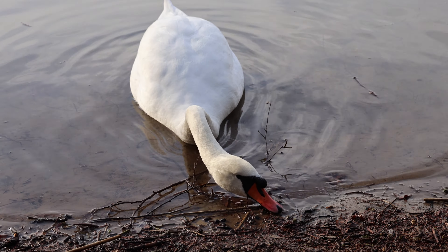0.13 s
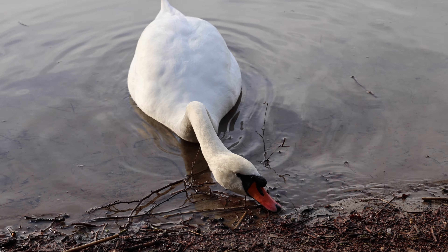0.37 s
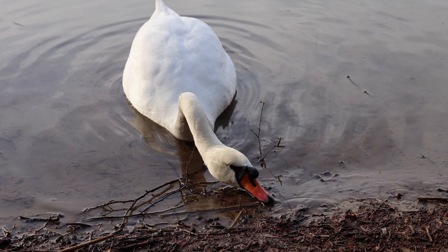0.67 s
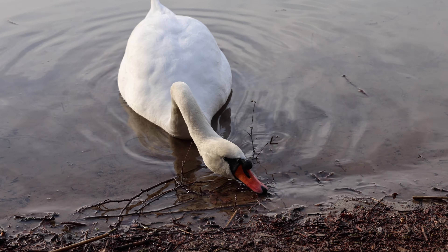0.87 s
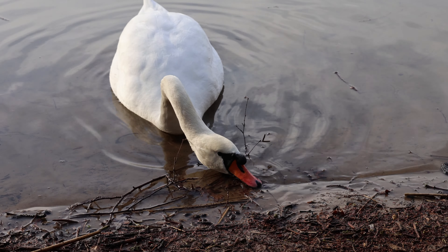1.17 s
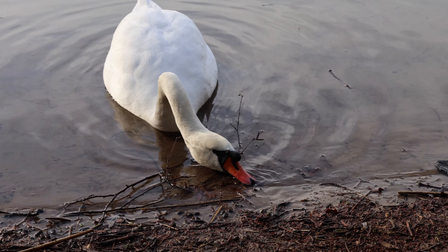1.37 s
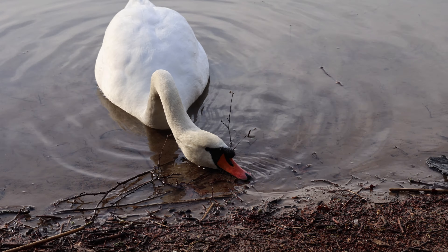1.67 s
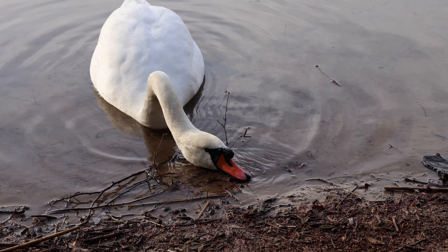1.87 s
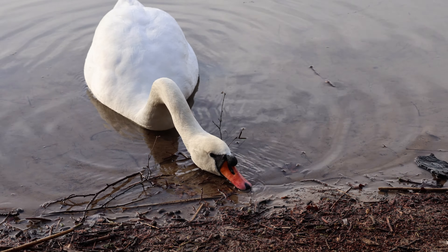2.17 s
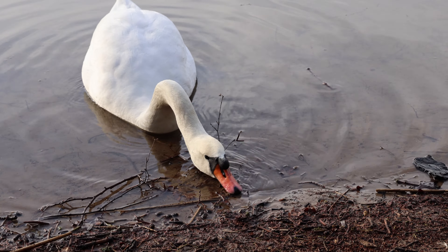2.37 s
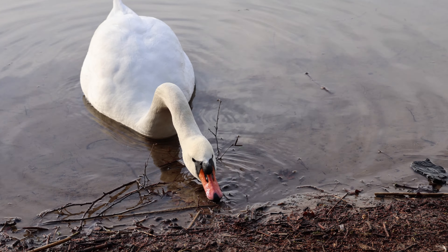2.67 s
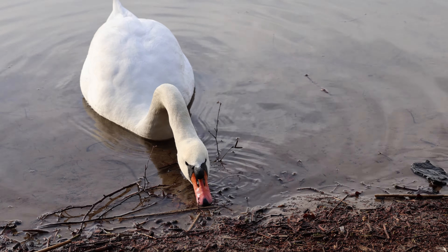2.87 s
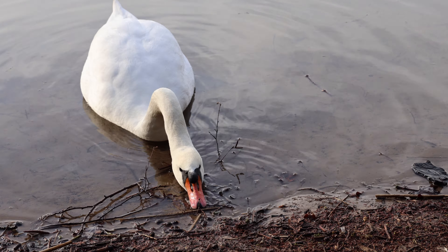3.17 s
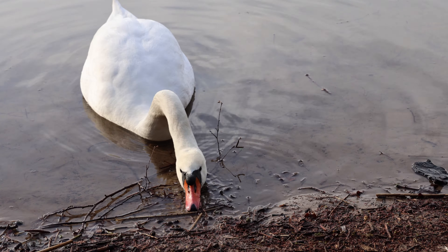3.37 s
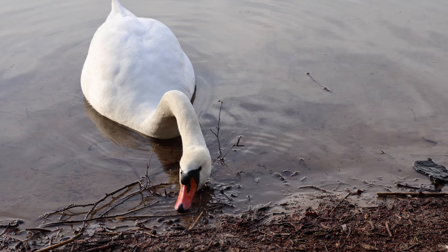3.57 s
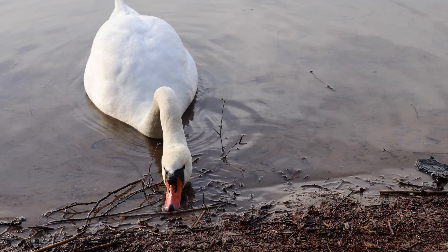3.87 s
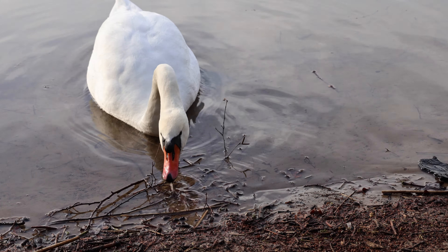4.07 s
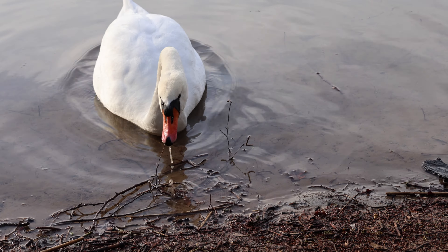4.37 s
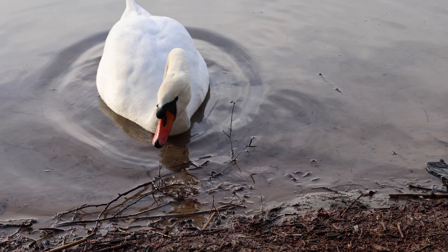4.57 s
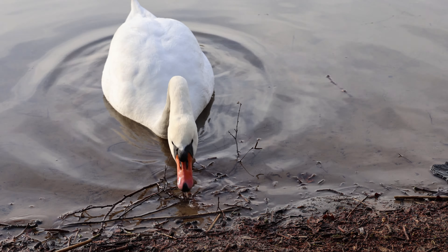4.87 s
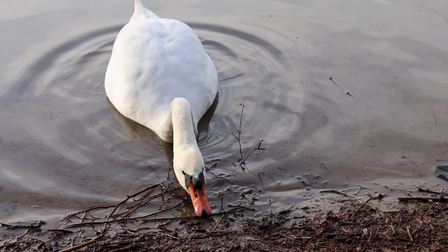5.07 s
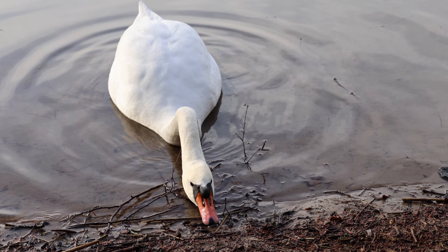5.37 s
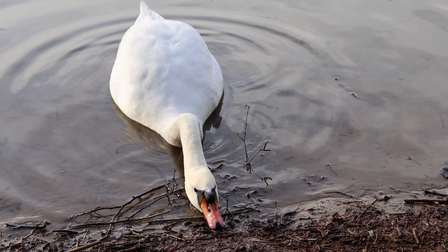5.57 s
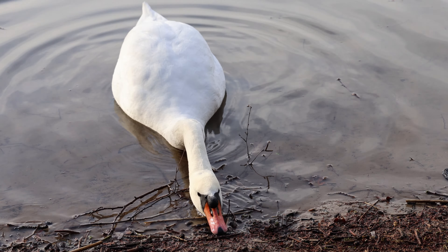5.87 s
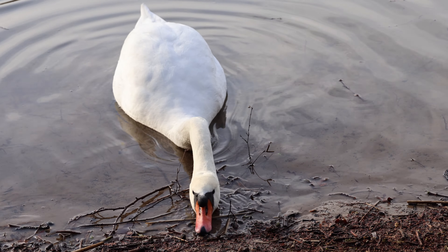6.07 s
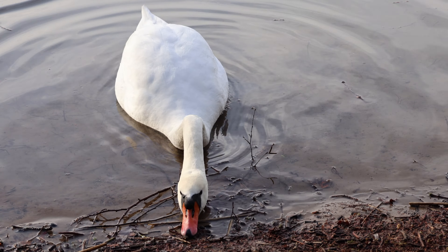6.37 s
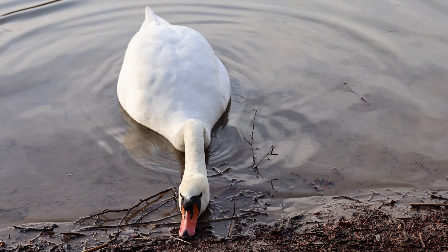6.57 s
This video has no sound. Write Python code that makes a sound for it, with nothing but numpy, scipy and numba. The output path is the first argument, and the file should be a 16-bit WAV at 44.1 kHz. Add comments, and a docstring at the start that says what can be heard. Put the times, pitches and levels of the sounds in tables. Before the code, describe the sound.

A swan dabbles in wet mud with tiny pops and squelches, then water trickles and plops off its lifted bill.

```python
"""Wet squelches and tiny pops, close by: a swan dabbles in the mud at the edge of a lake.
Its bill squeezes the mud, rings hollow and bursts bubbles; it lifts its head, water streams off and
plops back as trapped air rings, then it feeds on. A distant rumble and soft finger bumps on a
hand-held camera lie underneath; the camera's hum comb adds a faint flutter."""
import sys
import numpy as np
from scipy import signal
from scipy.fft import rfft, irfft, next_fast_len
from scipy.io import wavfile
from scipy.ndimage import uniform_filter1d
from numba import njit

SR = 44100
rng = np.random.default_rng(int(sys.argv[2]) if len(sys.argv) > 2 else 0)


def pcm_store(signal):
    """Save signal as 16-bit PCM."""
    levels = np.round(np.clip(np.atleast_2d(signal), -1, 1) * 32767)
    wavfile.write(sys.argv[1], SR, levels.astype(np.int16).T)


N = 296219
TIME = np.arange(N) / SR

# bill smacks, a bubble burst each: (time [s], level [dB], pitch [Hz], length [cycles], L-R [dB])
SMACKS = [(0.3126, -52.5, 4240, 6.4, -9), (0.4542, -40, 2630, 5.4, -6), (0.485, -46.5, 4500, 4.0, -9),
          (0.5017, -43, 4460, 1.1, -17), (0.5219, -33, 3570, 2.5, -6), (0.665, -47.5, 6300, 4.1, -15),
          (0.8242, -46.5, 4030, 5.4, -12), (0.949, -56.5, 6030, 5.1, -6), (1.1664, -38, 3710, 6.6, -10),
          (1.191, -41, 4360, 1.8, -14), (1.1978, -29, 5200, 1.75, -1), (1.3153, -34, 4100, 1, 4),
          (1.318, -33.5, 6200, 1.35, -4), (1.3597, -34, 3270, 1.7, 5), (1.437, -41.5, 6090, 2.8, -3),
          (1.4404, -30.5, 5700, 1.3, -1), (1.4433, -33, 7110, 0.72, -7), (1.446, -35, 10700, 3.6, 0),
          (1.5238, -32.5, 3180, 0.45, 1), (1.5303, -26.5, 3400, 1.7, 1), (1.581, -44, 8300, 2.4, -8),
          (1.6097, -40.5, 6700, 4.5, -3), (1.6308, -38.5, 5360, 2.4, 1), (1.6473, -38, 5340, 2.5, -2),
          (1.68, -51, 5100, 2.1, -6), (1.7034, -29, 4960, 0.93, -2), (1.706, -28, 3870, 2.4, 1),
          (1.751, -32.5, 4440, 0.85, 4), (1.766, -43, 4630, 2.1, 0), (1.7974, -42.5, 14000, 7.0, -5),
          (1.8857, -31.5, 3700, 2.7, 4), (1.8957, -33, 3940, 2.1, 1), (1.899, -26, 4800, 1.9, -2),
          (1.9013, -23, 4960, 0.83, -1), (1.912, -30.0, 4230, 1.5, 0), (1.93, -27, 3640, 4.1, 1),
          (1.9735, -41, 4900, 2.3, 1), (1.9782, -23.5, 5770, 1.4, -1), (1.9837, -23.5, 4400, 1.7, 3),
          (1.9848, -24.5, 4200, 1.6, 0), (2.0624, -32, 4280, 1, 3), (2.067, -35, 3250, 2.3, 2),
          (2.069, -32.5, 5330, 0.63, 1), (2.1484, -40.5, 5450, 1.1, 6), (2.1498, -31.5, 6490, 1.3, 0),
          (2.1561, -33.0, 3380, 2, 6), (2.1606, -31.5, 5530, 1.15, -2), (2.1936, -40.5, 5550, 1.1, -1),
          (2.2517, -39, 9960, 0.76, -5), (2.3324, -38.5, 5400, 1.9, 1), (2.3353, -34, 5700, 1.2, -2),
          (2.353, -38.0, 5840, 1.2, -2), (2.366, -37, 4060, 0.45, 5), (2.369, -43, 5930, 1.2, -8),
          (2.4282, -31, 6260, 2.1, -1), (2.5035, -42, 4850, 1.6, 6), (2.9285, -42.5, 4810, 7, 2),
          (3.0092, -40, 4030, 4.4, -19), (3.028, -37, 3750, 1.4, 9), (3.0428, -39, 3830, 0.97, 3),
          (3.0906, -40, 2600, 3.6, -12), (3.0967, -34.5, 5170, 0.98, -4), (3.1693, -40, 4870, 2.3, 1),
          (3.1703, -31, 5100, 0.65, 2), (3.2044, -38, 6010, 3.1, -1), (3.2498, -34.5, 5630, 4.3, -1),
          (3.255, -33, 6700, 2.2, -2), (3.3396, -33, 6040, 3.6, 0), (3.342, -39, 3220, 6.3, 2),
          (3.597, -35.5, 3430, 2.7, 9), (3.6768, -38.5, 4500, 1.2, 8), (3.7855, -26, 7180, 1.5, -3),
          (3.7961, -46, 11230, 2.3, 4), (3.8441, -28, 5800, 3.3, 1), (3.917, -28.5, 3040, 4.9, 9),
          (3.9754, -30.5, 6490, 0.54, 3), (3.9771, -43, 5000, 3.3, 11), (3.9789, -36, 6170, 4.9, 9),
          (4.0753, -28.5, 4170, 1.0, 4), (4.093, -26, 3470, 1.5, 6), (4.1077, -29, 3230, 2.6, -2),
          (4.1248, -36, 3400, 0.9, 6), (4.143, -45, 3710, 1.1, 25), (4.2703, -29.5, 5000, 2.1, 8),
          (4.3212, -33, 3750, 2.7, 13), (4.3975, -29, 5720, 0.76, -1), (4.4494, -36, 5000, 1.2, 5),
          (4.5632, -29.5, 6060, 0.84, 6), (4.6116, -39, 3860, 8.3, 12), (4.646, -29, 2300, 1.1, -3),
          (4.6499, -25.5, 3640, 1.3, 8), (4.6514, -33, 2950, 1.9, 2), (4.713, -42.5, 8400, 3.7, 7),
          (4.7444, -34, 4000, 7.9, -7), (4.783, -39.5, 6270, 7.0, 7), (4.8807, -38, 6290, 6.2, -1),
          (4.929, -48, 7670, 5, 12), (5.0758, -50.5, 5280, 7.3, 11), (5.0936, -47, 4470, 4.8, 18),
          (5.117, -55, 7240, 1.8, 10), (5.2869, -48.5, 3430, 3.6, 2), (5.3834, -49.5, 4440, 0.81, 6),
          (5.435, -45.5, 3600, 3.9, -2), (5.4524, -41.5, 3760, 3.6, -2), (5.4755, -43.5, 7100, 2.1, -5),
          (5.5356, -53, 9260, 8, -18), (5.611, -47.5, 4910, 3.6, -1), (5.649, -38.5, 5900, 1.3, -1),
          (5.7072, -38.5, 3010, 1.16, -1), (5.7649, -50, 8100, 3.7, -4), (5.783, -41.5, 3820, 6.8, -1),
          (5.787, -33.5, 3480, 1.2, -4), (5.7936, -51, 8800, 6.2, -14), (5.8006, -39.5, 7470, 3.9, 3),
          (5.8361, -41, 5180, 1.4, -2), (5.907, -49.5, 8990, 5.1, -16), (5.9263, -41.5, 8700, 3.4, -14),
          (5.9455, -38.0, 3040, 1.9, -4), (5.994, -52, 2640, 3.0, -4), (6.079, -35, 2800, 2.04, -9),
          (6.2432, -50, 7760, 3.2, -3), (6.4307, -42, 2930, 1.8, -4), (6.469, -41.5, 5240, 0.78, 0),
          (6.4806, -45, 8650, 3.2, -1), (6.5007, -38, 9400, 1.3, -1), (6.549, -45.5, 2900, 6.0, -4),
          (6.563, -39, 8850, 1.4, -6), (6.584, -34, 2680, 2.2, 2), (6.5857, -24, 2580, 1.7, -2),
          (6.6451, -52, 8040, 5.9, -3), (6.6804, -36.5, 3590, 2.2, 1)]
# bill direction: (time [s], L-R [dB], left phase lead [rad])
BILL_DIRECTION = [(1.1, -6, -1.4), (1.4, -0.5, -0.032), (2.4, 3, -0.36), (3.2, -1.5, 0.22),
                  (3.6, 1.5, 1.35), (4.8, 9.5, 2.2), (5.5, -1.5, -0.073), (6.7, -1.5, 0.84)]
# bill stirring, leaving and re-entering the water:
# (time [s], length [s], level [dB], first pitch [Hz], last pitch [Hz])
BILL_SLOSHES = [(3.586, 0.037, -56.5, 4230, 2910), (3.767, 0.076, -57.5, 3400, 3080),
                (3.892, 0.068, -56, 2880, 3530), (4.081, 0.048, -51.5, 3130, 3020),
                (4.159, 0.042, -58.5, 2700, 2600), (4.267, 0.062, -56, 5750, 3570),
                (4.328, 0.016, -67, 4370, 3800), (4.402, .045, -51.5, 2970, 3330),
                (4.459, 0.016, -61.5, 4600, 3620), (4.53, 0.021, -63, 3400, 3800),
                (4.575, .055, -60, 2800, 3950), (4.631, 0.035, -62, 2530, 2500),
                (4.683, 0.11, -72, 4000, 4700)]


def undb(db):
    """Decibels to gain."""
    return 10 ** (np.asarray(db) / 20)


def curves(table):
    """Columns after the time column, interpolated per sample."""
    times_s, *columns = np.transpose(table)
    return [np.interp(TIME, times_s, column) for column in columns]


def swell(start_s, end_s, attack_s, release_s):
    """Linear rise, hold, exponential decay after end_s."""
    attack = np.clip((TIME - start_s) / attack_s, 0, 1)
    return attack * np.exp(-np.clip((TIME - end_s) / release_s, 0, 30))


def unit(x):
    """Scale to rms 1."""
    return x / np.sqrt(np.mean(x ** 2) + 1e-20)


def band(x, lo_hz, hi_hz, order=2):
    """Causal band-pass."""
    sos = signal.butter(order, [lo_hz, min(hi_hz, .48 * SR)], "band", fs=SR, output="sos")
    return signal.sosfilt(sos, x)


def colour(x, points):
    """Shape a spectrum by (frequency [Hz], gain [dB]) points."""
    hz, db = np.transpose(points)
    gain_db = np.interp(np.log(np.fft.rfftfreq(N, 1 / SR) + 1), np.log(hz), db)
    return irfft(rfft(x) * undb(gain_db), N)


def sides(pan_db):
    """Left and right gains, mean 1; positive is left."""
    gains = undb(np.array([[.5], [-.5]]) * pan_db)
    return gains / gains.mean(axis=0)


def add(out, time_s, sound):
    """Mix in a stereo sound."""
    i = max(int(time_s * SR), 0)
    out[:, i:i + sound.shape[-1]] += sound[..., :N - i]


def bubble(hz, rise_oct_per_s, swell_s, t60_s, glide_s=0.026):
    """Damped resonance whose pitch glides, then levels off; a bubble nearing the surface climbs."""
    t = np.arange(int((t60_s + 2 * swell_s) * SR) + 8) / SR
    envelope = (1 - np.exp(-(t / swell_s) ** 2)) * np.exp(-np.log(1000) * t / t60_s)
    octaves = rise_oct_per_s * glide_s * (1 - np.exp(-t / glide_s))
    return envelope / envelope.max() * np.sin(2 * np.pi * np.cumsum(hz * 2 ** octaves) / SR)


@njit
def ring_grains(start, hz, cycles, size):
    """Sum of tone pips, each peaking after half its cycles, then fading; start in samples."""
    out = np.zeros(N)
    for k in range(len(start)):
        fade = 2 * hz[k] / (cycles[k] * SR)
        phasor, step = size[k] + 0j, np.exp(2j * np.pi * hz[k] / SR - fade)
        for i in range(min(N - start[k], int(9 / fade))):
            out[start[k] + i] += phasor.imag * i * fade
            phasor *= step
    return out


def fizz(rate_per_s, lo_hz, hi_hz, cycles, spread_db, scatter_db, count):
    """Stream of tiny bubbles, many weak and a few strong, held near rms 1."""
    when, pitch, strength, chance, side, shape = rng.random((count, 6)).T
    start = (when * N).astype(np.int64)
    hz = np.minimum(lo_hz * (hi_hz / lo_hz) ** pitch, .45 * SR)
    sounding = chance < rate_per_s * N / SR / count
    size = undb(-spread_db * np.log(strength + 0.0067)) * sounding
    pan = undb(scatter_db * (side - .5))
    right_lag = (3 * shape).astype(np.int64)
    pips = np.array([ring_grains(start + lag, hz, cycles * (.5 + shape), size * gain)
                     for lag, gain in ((1, pan), (right_lag, 1 / pan))])
    power = uniform_filter1d(uniform_filter1d(np.mean(pips ** 2, axis=0), size=4000), size=4000)
    return pips / np.sqrt(np.abs(power) + 0.0048 * power.mean())


def distant_rumble(gain_db=1):
    """Slowly swelling noise from across the lake, nearly mono around 200 Hz."""
    spectrum = [(18, -78), (30, -47), (64, -22.5), (168, -16), (202, 2), (350, -17), (728, -6.5), (996, -8),
                (1510, -10.5), (3320, -26), (4660, -38.5), (6500, -46.5), (9680, -48.5), (11300, -55),
                (13600, -52), (15500, -59)]  # rumble: (frequency [Hz], relative density [dB])
    loudness = [(0.0, -63), (0.58, -60.5), (1.18, -63), (1.46, -57), (2.17, -55.5), (2.71, -59.5),
                (3.78, -55.5), (4.26, -54), (5.16, -57), (6.72, -59)]  # slow swell: (time [s], level [dB])
    width = [(60, 8.5), (200, -30), (700, -12.5), (1300, -7), (2400, -1.5), (8000, -0.5)]  # stereo width: (frequency [Hz], side minus mid [dB])
    mid, side = colour(rng.standard_normal((2, N)), spectrum)
    level_db, = curves(loudness)
    rumble = mid + colour(side, width) * np.array([[1], [-1]])
    return rumble / np.std(band(mid, 168, 3300, order=4)) * undb(level_db + gain_db) * sides(0.047)


def handling(t60_cycles=4.5, bump_pan_db=31, rustle_db=-1):
    """Fingers rustle on the camera body and bump it by the left microphone."""
    finger_bumps = [(2.175, -39.5, 171), (2.306, -40.5, 123), (2.41, -38, 203), (2.487, -34.5, 153),
                    (2.5244, -24, 282), (2.540, -25, 160), (2.551, -32, 330), (2.586, -30.5, 220),
                    (2.968, -28.5, 284), (3.223, -36, 260), (3.378, -40.5, 233), (3.552, -39.5, 250),
                    (4.367, -39.5, 211), (4.464, -32, 178), (4.718, -30, 167), (4.752, -27.5, 216),
                    (4.794, -30.5, 167), (4.818, -35.5, 190), (4.833, -41.5, 182)]  # soft knocks: (time [s], level [dB], pitch [Hz])
    grip = [(0.0, -64), (1.55, -58), (1.79, -59.5), (2.47, -51.5), (2.79, -62), (3.27, -54.5),
            (3.65, -63.5), (3.91, -53.5), (4.02, -55), (4.77, -49), (5.16, -61), (5.69, -57), (6.21, -62.5),
            (6.72, -56.5)]  # low grip rustle: (time [s], level [dB])
    bumps = np.zeros((2, N))
    for time_s, db, hz in finger_bumps:
        knock = bubble(hz, 0, swell_s=0.0016, t60_s=t60_cycles / hz)
        add(bumps, time_s, undb(db) * sides(bump_pan_db) * knock)
    grip_db, = curves(grip)
    rustle = unit(band(rng.standard_normal(N) + .5 * rng.standard_normal((2, N)), 123, 288))
    return band(bumps, 68, 1100, order=3) + rustle * undb(grip_db + rustle_db) * sides(0.9)


def dabbling(hollow_width_hz=600, smack_mud_db=-29, smack_spray_db=-38, stray_db=-2):
    """Each squeeze crackles in the mud, rings the bill's wet hollow and bursts stray bubbles."""
    # bill squeezes: (start [s], end [s], squelch [dB], spray [dB], hollow [dB], hollow pitch [Hz])
    squeezes = [(0.07, 0.137, -98, -84, -99, 3520), (.296, 0.316, -79, -78, -84, 4200),
                (0.495, 0.557, -65, -70.5, -63.5, 3370), (.615, 0.656, -84, -81.5, -90, 3500),
                (1.213, 1.286, -59.5, -76, -62.5, 3800), (1.308, 1.409, -62.5, -71, -67, 3460),
                (1.432, 1.495, -65, -69, -64.5, 3370), (1.524, 1.657, -62.5, -70, -92, 3630),
                (1.696, 1.802, -70, -69, -58.5, 3430), (1.883, 1.999, -51, -77, -52, 3500),
                (2.037, 2.099, -71, -76, -61, 3400), (2.132, 2.199, -68, -68.5, -64, 3330),
                (2.226, 2.398, -74, -92, -61.5, 3680), (2.992, 3.046, -83, -60.5, -60.5, 3650),
                (3.087, 3.195, -68, -85, -60.5, 3300), (3.204, 3.26, -59.5, -78, -73, 3300),
                (5.101, 5.13, -82, -71.5, -76, 4600), (5.591, 5.68, -68, -95, -66.5, 3370),
                (5.748, 5.856, -77, -74.5, -68.5, 3570), (5.904, 6.031, -90, -72, -69.5, 3500),
                (6.23, 6.264, -62.5, -70.5, -75, 3500), (6.315, 6.363, -71, -80.5, -74.5, 3950),
                (6.458, 6.58, -70, -65, -72.5, 2840), (6.625, 6.683, -69, -67.5, -79, 3300)]
    sparkle = [(1.2, -4), (1.8, -5), (2.3, 7.5), (3.1, -16), (5.1, 2), (5.6, -8.5), (6.7, -12)]  # top treble of the spray: (time [s], relative level [dB])
    ticks = fizz(380, 4200, 14000, cycles=1.7, spread_db=6, scatter_db=8, count=6000)
    seep = fizz(1500, 2800, 5000, cycles=1.2, spread_db=4, scatter_db=8, count=12000)
    strays = fizz(35, 8000, 10500, cycles=9, spread_db=4, scatter_db=8, count=1000)
    squelch_gain, spray_gain, smack_gain = np.zeros((3, N))
    hollow = np.zeros((2, N))
    for start_s, end_s, squelch_db, spray_db, hollow_db, hz in squeezes:
        squeeze = swell(start_s, end_s, attack_s=0.0027, release_s=0.0052)
        squelch_gain += squeeze * undb(squelch_db)
        spray_gain += squeeze * undb(spray_db)
        ring = unit(band(seep, hz - hollow_width_hz / 2, hz + hollow_width_hz / 2))
        hollow += undb(hollow_db) * squeeze * ring
    for time_s, db, _, cycles, _ in SMACKS:
        smack = swell(time_s - 0.006, time_s, attack_s=0.006, release_s=0.016)
        smack_gain = np.maximum(smack_gain, undb(db) / cycles * smack)  # longer pops stir less mud
    mud = unit(band(ticks, 4400, 8330, order=3))
    mud *= np.hypot(squelch_gain, undb(smack_mud_db) * smack_gain)
    sparkle_db, = curves(sparkle)
    spray = unit(band(ticks, 6440, 10030, order=4))
    spray += undb(sparkle_db) * unit(band(ticks, 11650, 14700, order=4))
    spray *= np.hypot(spray_gain, undb(smack_spray_db) * smack_gain)
    return mud + spray + hollow + undb(stray_db) * strays * spray_gain


def pops(ring_db=-14, snap_db=-15):
    """A water film snaps within a few cycles; the cavity behind it rings on more softly."""
    out = np.zeros((2, N))
    t = np.arange(-SR // 1000, SR // 80) / SR
    for time_s, db, hz, cycles, pan_db in SMACKS:
        burst = np.exp(-np.log(2) * (2 * t * hz / cycles) ** 2) * np.cos(2 * np.pi * hz * t)
        snap = np.exp(-(t * 2 * hz) ** 2) * np.sin(2 * np.pi * min(2 * hz, 13000) * t) / cycles
        ring = np.sqrt(cycles) * bubble(hz, rise_oct_per_s=30, swell_s=2 / hz, t60_s=0.0052)
        gain = undb(db) * sides(pan_db)
        add(out, time_s + t[0], gain * (burst + undb(snap_db) * snap))
        add(out, time_s + cycles / hz / 2, gain * undb(ring_db) * ring)
    return band(out, 1800, 15500)


def froth(gain_db=-13.5, jitter_s=0.006, spread_oct=0.42, climb_oct=0.43, count=14):
    """Tiny films snap in a cluster around each pop; the shorter the pop, the louder the froth."""
    time_s, db, pop_hz, pop_cycles, pan_db = np.repeat(SMACKS, count, axis=0).T
    wait, pitch, size, side = rng.standard_normal((len(time_s), 4)).T
    start = (np.maximum(time_s + jitter_s * (wait + .1), 0) * SR).astype(np.int64)
    hz = np.clip(pop_hz * 2 ** (climb_oct + spread_oct * pitch), 2500, 15000)
    strength = undb(db + gain_db - 6 * np.log2(pop_cycles) + 2.5 * size)
    cycles = np.full(len(time_s), 1.8)
    films = [ring_grains(start, hz, cycles, strength * gain) for gain in sides(pan_db + 4 * side)]
    return band(np.array(films), 2000, 12000, order=3)


def plops(pan_db=2):
    """Falling water traps pockets of air that ring."""
    # air pockets: (time [s], level [dB], pitch [Hz], initial rise [oct/s], swell [s], t60 [s])
    pockets = [(0.508, -49.5, 1560, 5.5, 0.0025, 0.066), (.519, -47.5, 796, 13.5, 0.0042, 0.095),
               (1.835, -38.5, 206, 7, 0.00086, 0.02), (3.882, -40, 275, -3, 0.0018, 0.069),
               (4.086, -42, 1093, 13, .001, 0.025), (4.104, -32, 364, -6, .002, 0.038),
               (4.162, -23, 276, 20, 0.0012, 0.027), (4.172, -27.5, 419, 27, .016, 0.056),
               (4.3064, -26.5, 630, -11, 0.0009, 0.0095), (4.332, -35.5, 374, -8, 0.0013, 0.036),
               (4.411, -34, 1450, 13, 0.0011, 0.03), (4.411, -35.5, 550, -6, 0.0016, 0.028),
               (4.6332, -30, 2180, 10, 0.0011, 0.0048), (4.639, -46, 2330, 5, .001, 0.015),
               (4.660, -40.5, 2240, 7, 0.00092, 0.02), (5.569, -35.5, 259, 2.5, 0.0034, 0.089)]
    out = np.zeros((2, N))
    for time_s, db, hz, rise_oct_per_s, swell_s, t60_s in pockets:
        add(out, time_s, undb(db) * sides(pan_db) * bubble(hz, rise_oct_per_s, swell_s, t60_s))
    return out


def slurps(swarms, gain_db, spread_oct, cycles, count):
    """Swarms of like-sized bubbles whose pitch slides as the gap at the bill changes."""
    time_s, length_s, db, first_hz, last_hz = np.repeat(swarms, count, axis=0).T
    total = len(time_s)
    progress = (np.arange(total) % count + rng.random(total)) / count
    pitch, size, side = rng.standard_normal((total, 3)).T
    hz = first_hz * (last_hz / first_hz) ** progress * 2 ** (spread_oct * pitch)
    overlap = cycles * count / (hz * length_s)
    strength = undb(db + gain_db + 3.5 * size) * 4 / np.sqrt(overlap)
    start = ((time_s + progress * length_s) * SR).astype(np.int64)
    gains = sides(side * np.minimum(hz / 600, 5))
    return np.array([ring_grains(start, hz, np.full(total, cycles), strength * gain) for gain in gains])


def gulps():
    """Large bubbles churn up under the bill."""
    # bubble swarms: (time [s], length [s], level [dB], first pitch [Hz], last pitch [Hz])
    swarms = [(.512, .035, -63.5, 1500, 894), (4.1, .058, -44.5, 550, 567), (4.162, .07, -45.5, 490, 547),
              (4.315, .04, -50, 690, 443), (4.413, .045, -57, 1390, 1800)]
    return slurps(swarms, gain_db=0.5, spread_oct=0.24, cycles=2.1, count=16)


def gushes(lo_hz, hi_hz):
    """Running water frees its bubbles in uneven gushes, 30 a second."""
    hold = SR // 30
    steps = np.repeat(rng.standard_normal(N // hold + 1), hold)
    gush_db = 3.2 * uniform_filter1d(steps, size=hold // 2)[:N]
    return undb(gush_db) * fizz(1700, lo_hz, hi_hz, cycles=2.5, spread_db=2.5, scatter_db=31, count=12000)


def stream(start_s=3.66, end_s=4.592, attack_s=0.098, level_db=-61):
    """Water fizzes off the lifted bill, surges with each slosh and gurgles where it meets the lake."""
    run_off = [(3.7, 0), (3.8, -1.5), (4.02, 3.5), (4.12, 0), (4.22, -3.5), (4.29, 4), (4.37, -2.5),
               (4.44, 8), (4.52, -3.5), (4.62, 4.5)]  # flow swelling and thinning: (time [s], relative level [dB])
    flow_db, = curves(run_off)
    flow = undb(level_db + flow_db)
    running = flow * swell(start_s, end_s, attack_s, release_s=0.16)
    misting = flow * swell(start_s, end_s, attack_s, release_s=0.11)
    surge = sum(undb(db) * swell(time_s, time_s + length_s, attack_s=0.011, release_s=0.011)
                for time_s, length_s, db, _, _ in BILL_SLOSHES)
    rinse = gushes(3200, 4800) + undb(-1) * gushes(4600, 7800)
    mist = gushes(5900, 8900) + gushes(11600, 15900)
    gurgle = fizz(500, 960, 2750, cycles=8, spread_db=6.5, scatter_db=6, count=9000)
    spatter = fizz(90, 4500, 13000, cycles=3, spread_db=6.5, scatter_db=10, count=3000)
    return (band(rinse, 1640, 15000, order=3) * np.hypot(undb(2.5) * running, undb(-5) * surge)
            + band(spatter, 4000, 15000) * undb(-8) * misting
            + mist * np.hypot(undb(-9) * misting, undb(-13) * surge * (TIME > start_s))
            + gurgle * undb(-5) * np.hypot(running, surge))


def at_ports(x, lead_rad):
    """The two microphone ports hear the bill out of phase."""
    analytic = signal.hilbert(x, next_fast_len(N), axis=1)[:, :N]
    return np.real(analytic * np.exp(np.array([[.5j], [-.5j]]) * lead_rad))


def shore(x, scatter_db, decay_s):
    """Mud, twigs and the water surface add a short scatter tail, different in each ear."""
    t = np.arange(SR // 30) / SR
    tail = rng.standard_normal((2, len(t))) * np.exp(-t / decay_s) * (t > .0003)
    tail /= np.sqrt(np.sum(tail ** 2, axis=1, keepdims=True))
    return x + undb(scatter_db) * signal.fftconvolve(x, tail, axes=1)[:, :N]


def scene():
    """Bill and water sounds scattered by the shore, over handling and far rumble."""
    pan_db, lead_rad = curves(BILL_DIRECTION)
    wet = dabbling() + stream()
    wet += slurps(BILL_SLOSHES, gain_db=3, spread_oct=0.304, cycles=4.3, count=44)
    bill = at_ports(pops() + froth() + sides(pan_db) * wet, lead_rad)
    bill = shore(bill, scatter_db=-4, decay_s=.003)
    bill = shore(bill, scatter_db=-10.5, decay_s=0.019)  # bank behind
    water = band(plops() + gulps(), 83, 9700)
    high = band(water, 775, 6900, order=4)  # long waves pass over the twigs unscattered
    water += shore(high, scatter_db=3, decay_s=0.0063) - high
    return bill + water + handling() + distant_rumble()


def record(dry, mains_hz=60, repeat_gain=.25, bass_repeat_gain=0.22, feedback=.55, top_hz=15900):
    """Port notches, a hum comb leaving faint inverted repeats (most in the bass), then a top cut."""
    port_dips = [(5600, 71), (11300, 410)]  # microphone port notches: (frequency [Hz], width [Hz])
    for hz, width_hz in port_dips:
        dry = signal.lfilter(*signal.iirnotch(hz, hz / width_hz, fs=SR), dry)
    period = round(SR / mains_hz)
    bass = signal.sosfiltfilt(signal.butter(2, 1200, fs=SR, output="sos"), dry)
    comb_in = repeat_gain * dry + bass_repeat_gain * bass
    repeats = np.zeros_like(dry)
    for k in range(1, 12):
        repeats[:, k * period:] += feedback ** (k - 1) * comb_in[:, :N - k * period]
    return signal.sosfilt(signal.ellip(8, .2, 70, top_hz, fs=SR, output="sos"), dry - repeats)


dry = scene()
out = record(dry)
pcm_store(out)
```